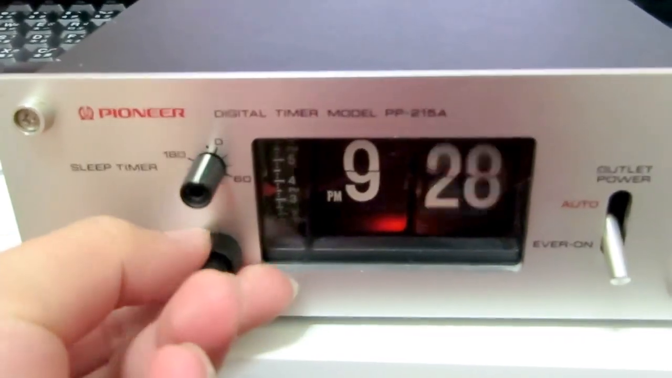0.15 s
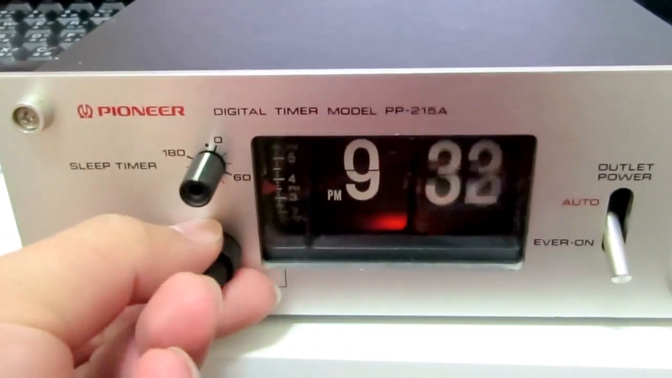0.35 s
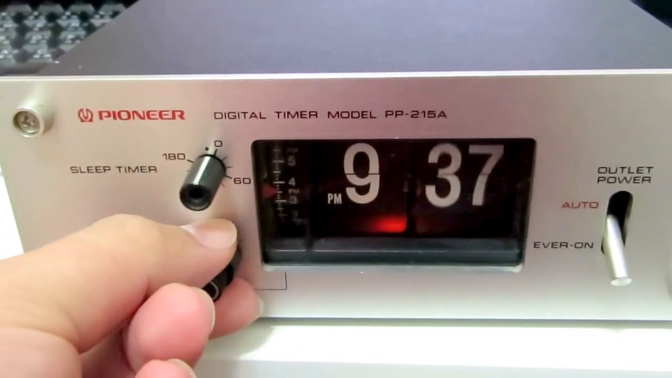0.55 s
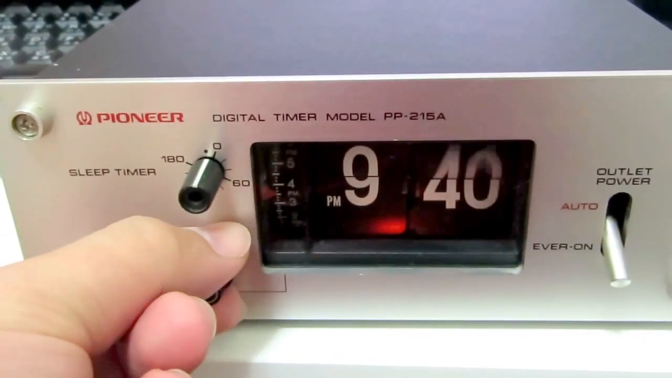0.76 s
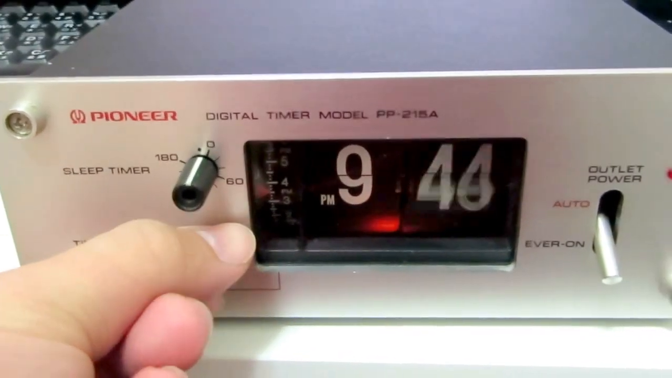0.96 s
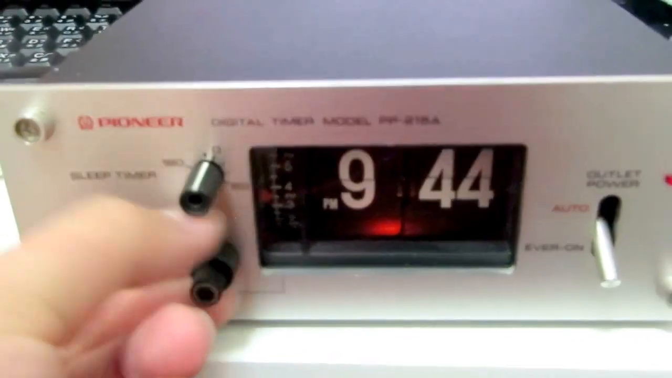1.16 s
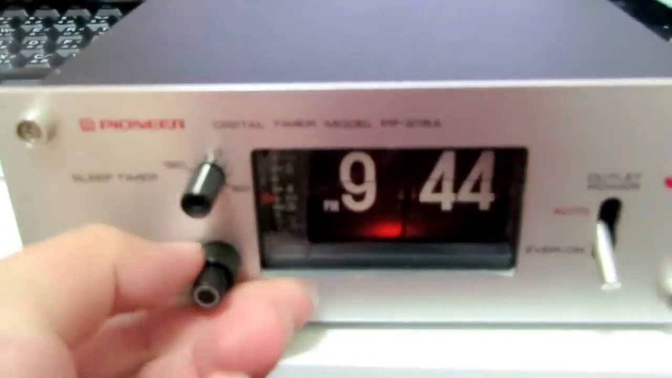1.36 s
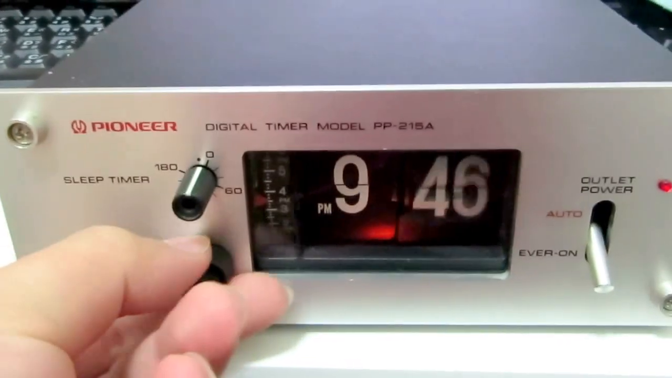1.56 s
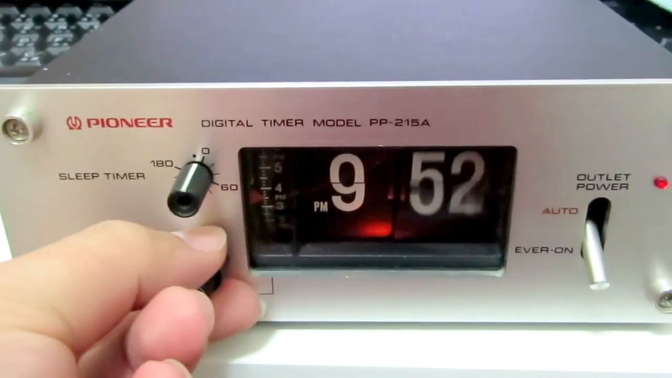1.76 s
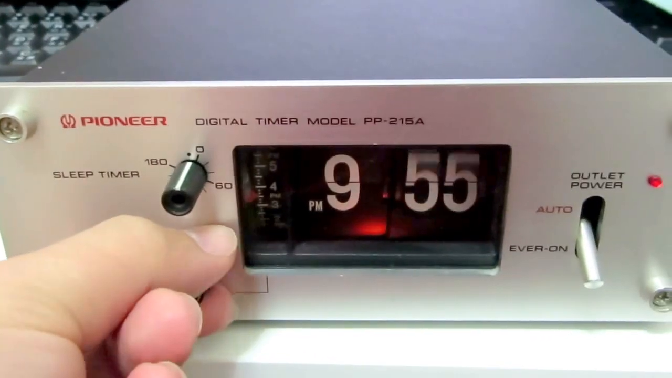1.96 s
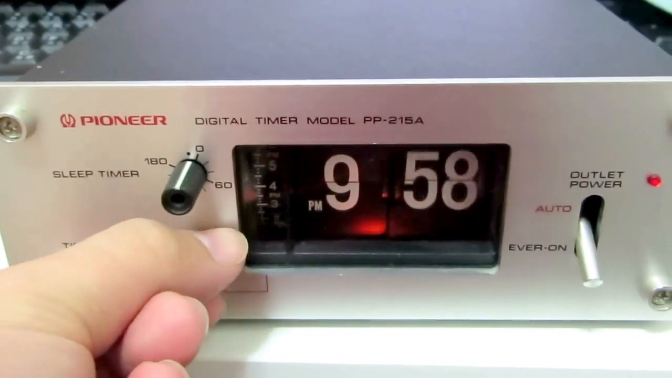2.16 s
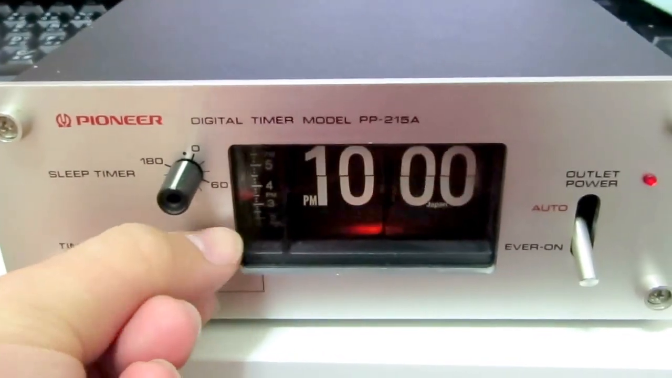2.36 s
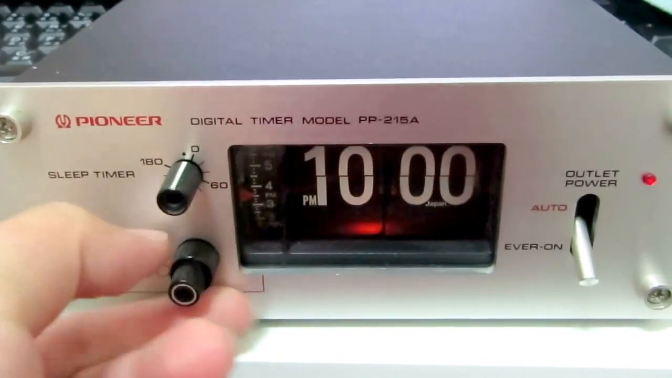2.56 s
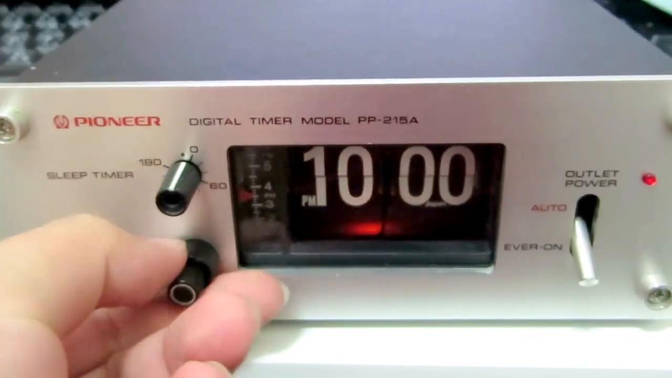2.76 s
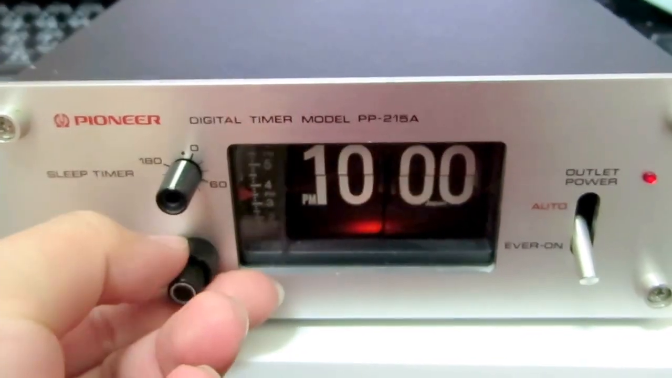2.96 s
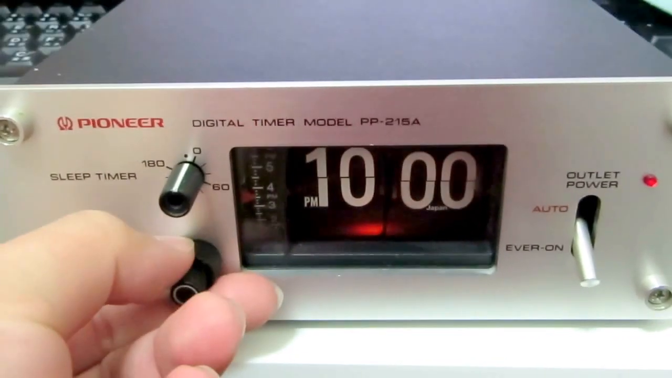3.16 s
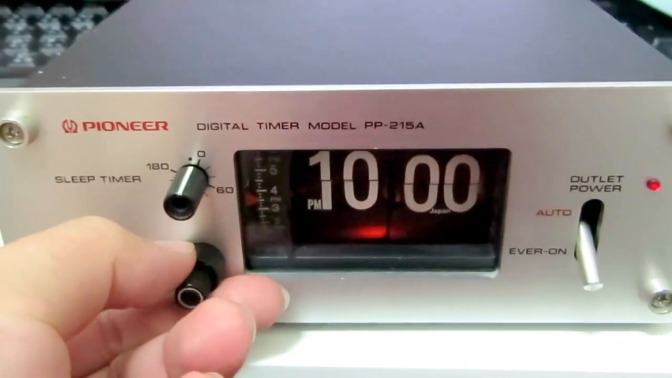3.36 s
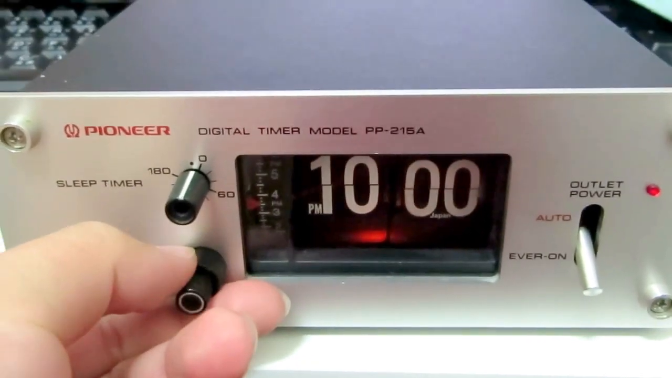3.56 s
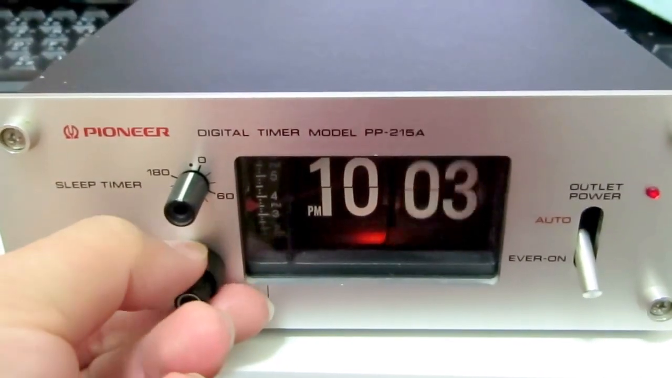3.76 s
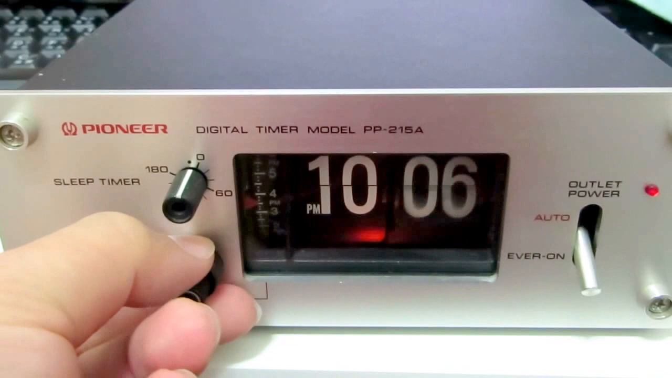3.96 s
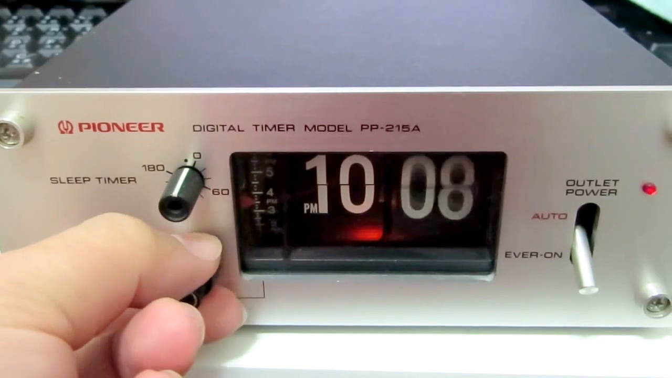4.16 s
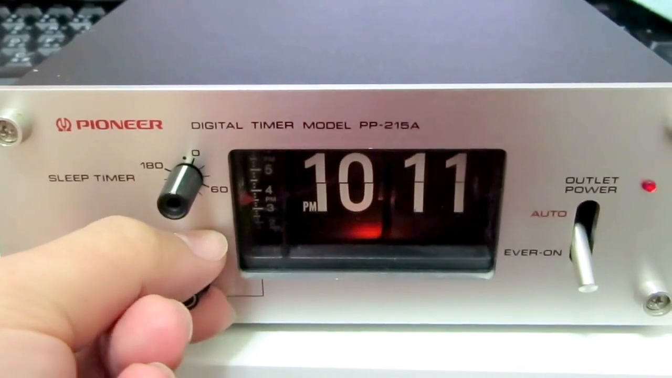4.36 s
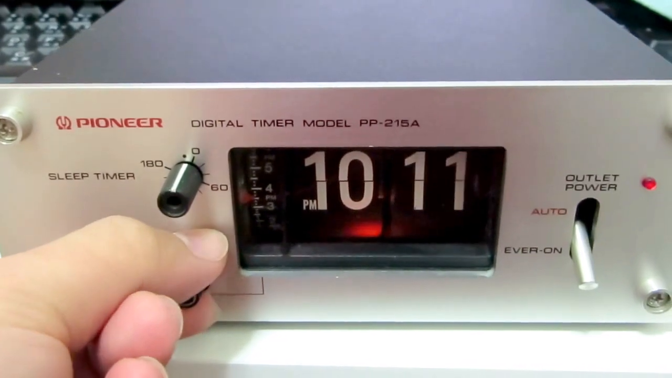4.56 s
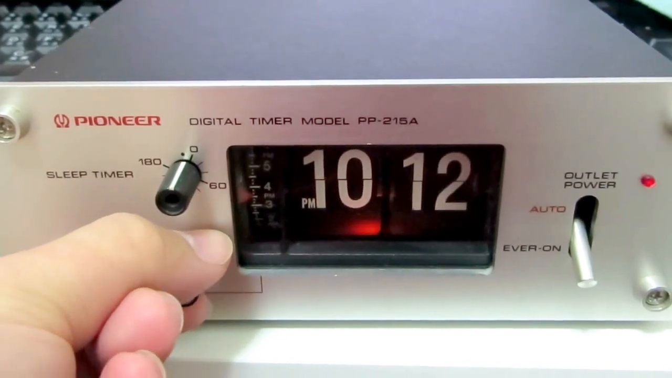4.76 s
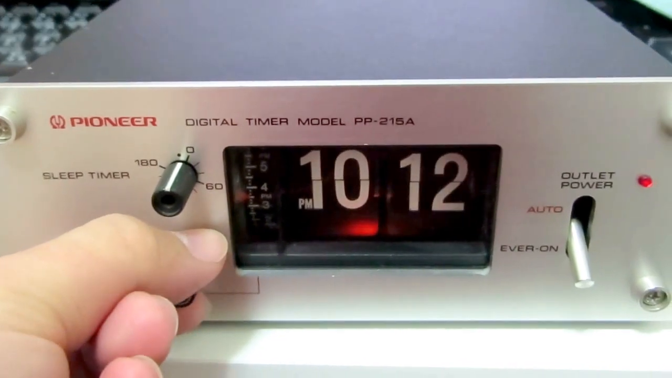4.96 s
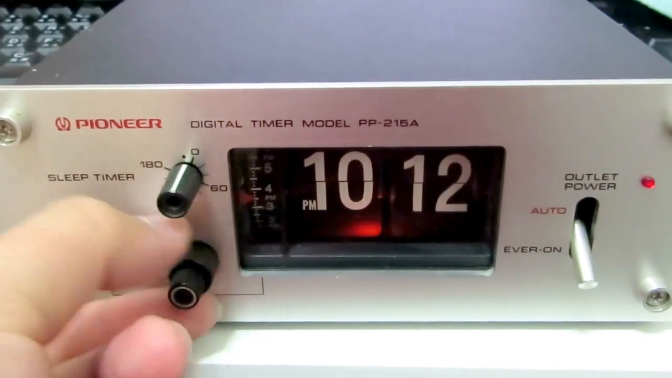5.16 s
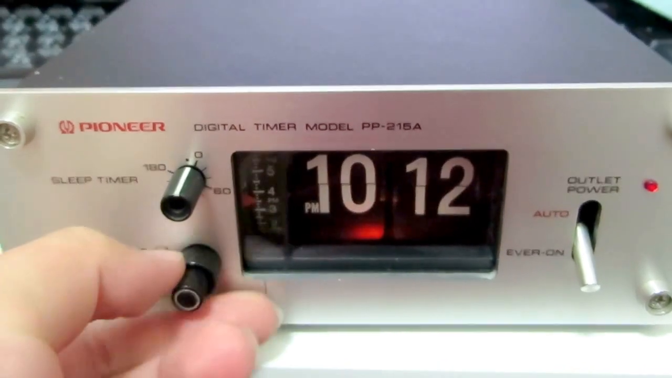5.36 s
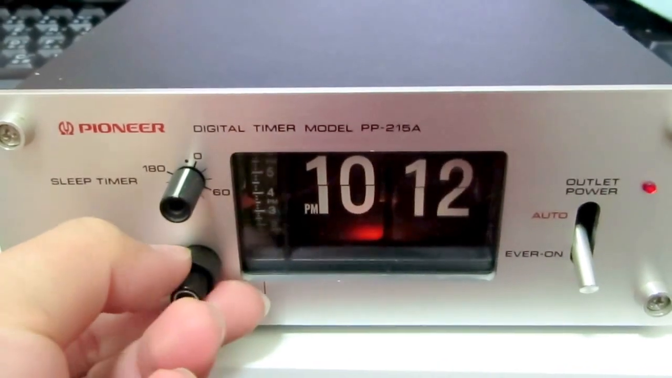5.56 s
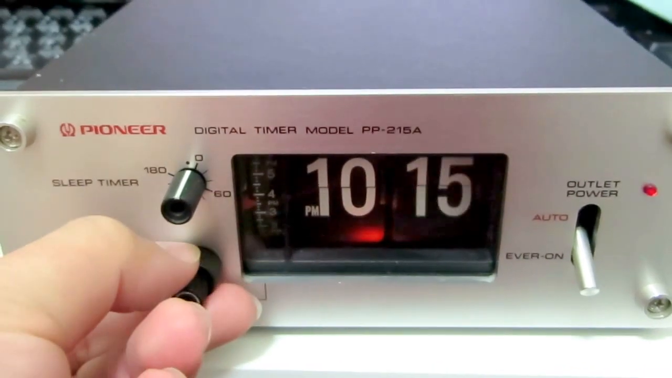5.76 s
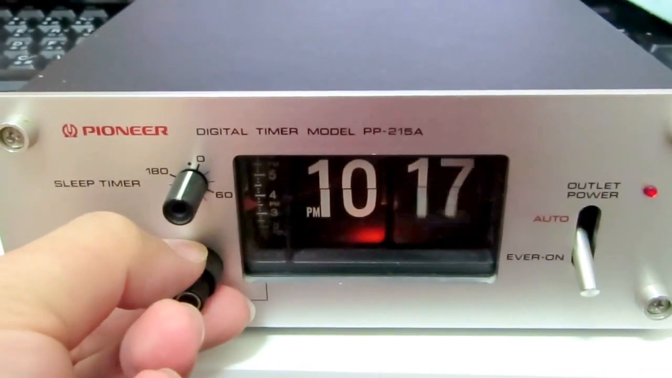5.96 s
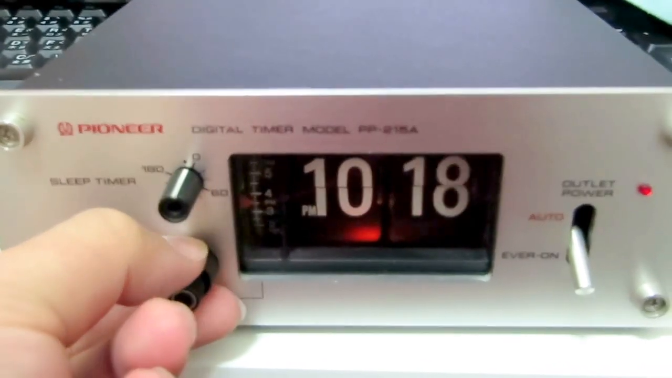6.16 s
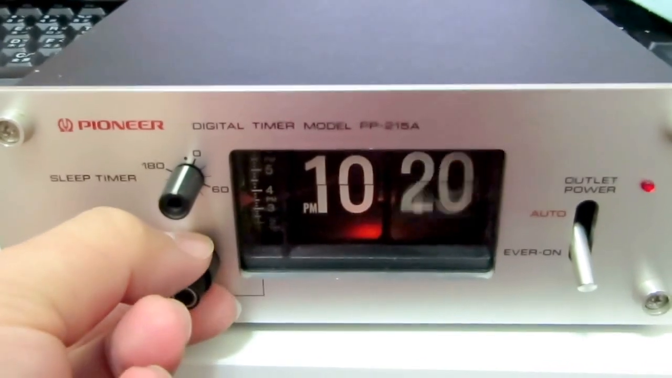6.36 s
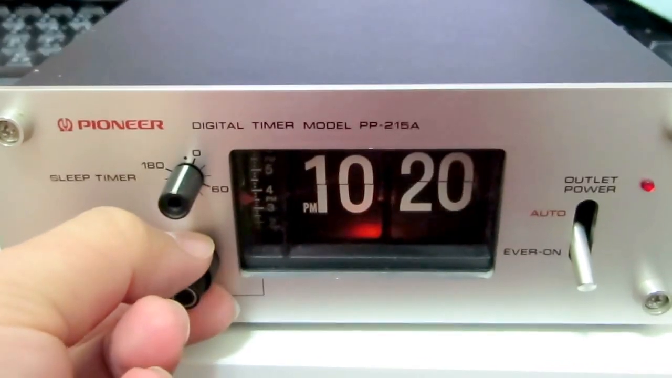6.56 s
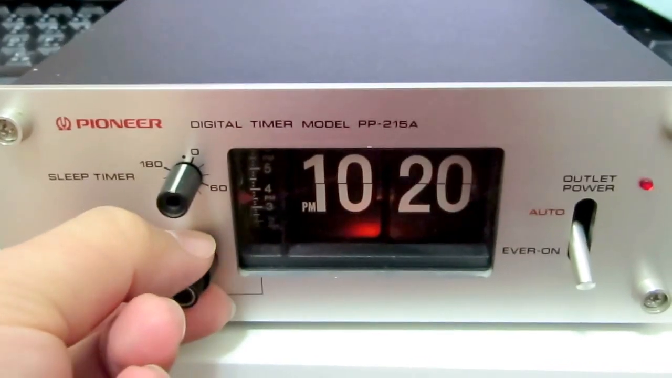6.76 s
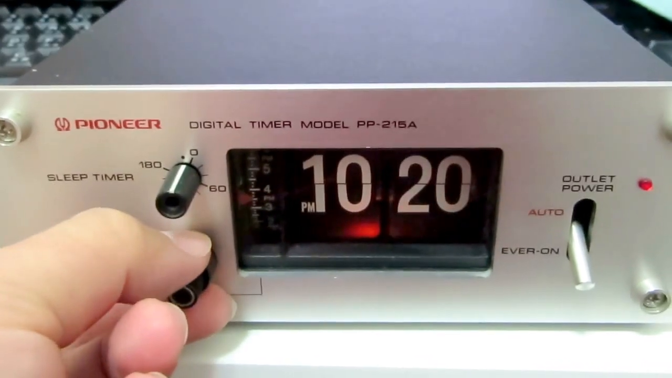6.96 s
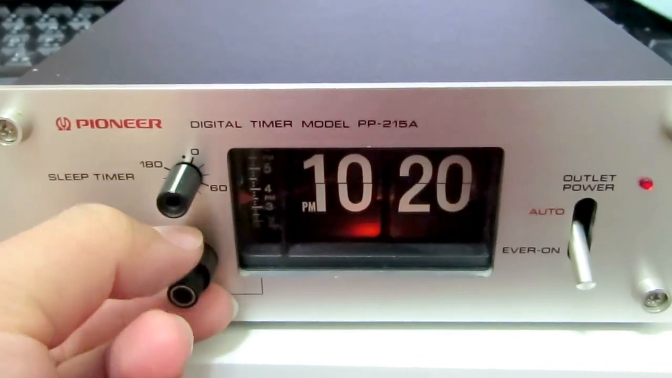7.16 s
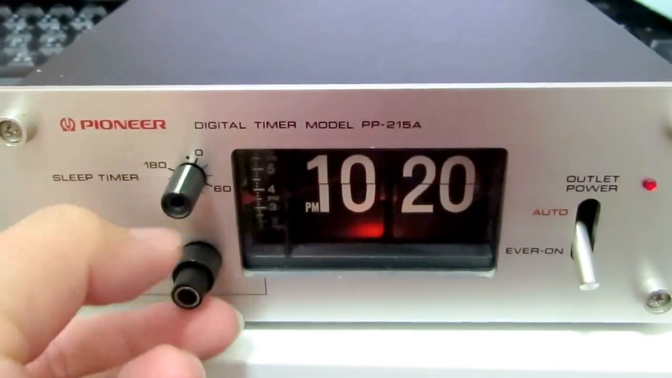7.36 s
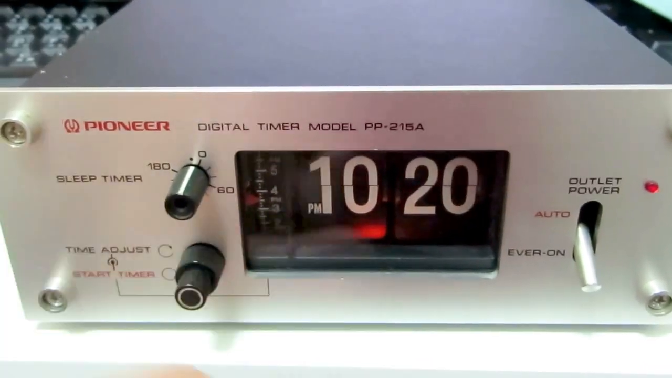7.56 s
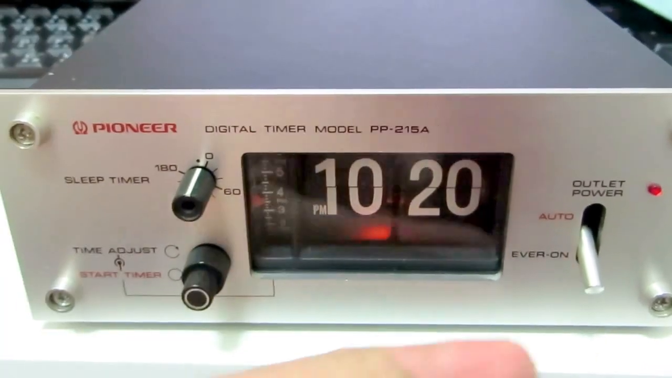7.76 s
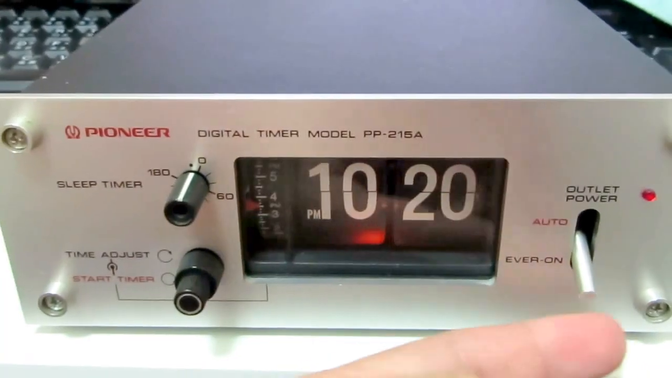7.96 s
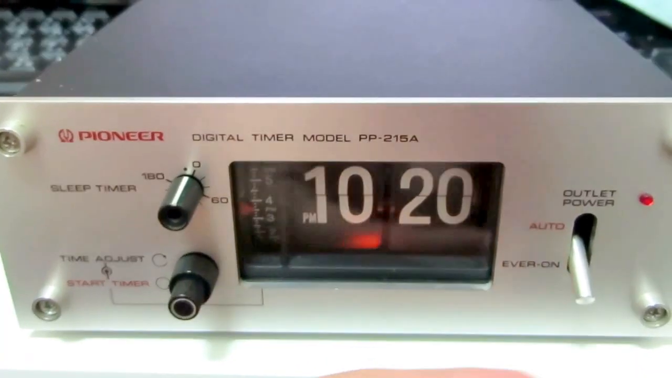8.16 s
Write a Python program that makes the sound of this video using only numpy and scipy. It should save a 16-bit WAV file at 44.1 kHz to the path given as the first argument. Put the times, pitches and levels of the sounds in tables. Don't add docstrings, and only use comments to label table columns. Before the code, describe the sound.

A knob is twisted in four turns, flip clock flaps snapping down in crisp irregular clicks, with small finger taps between over quiet hum.

```python
import sys
import numpy as np
from scipy import signal
from scipy.fft import rfft, irfft, next_fast_len
from scipy.io import wavfile
from scipy.ndimage import uniform_filter1d

SR = 44100
rng = np.random.default_rng(int(sys.argv[2]) if len(sys.argv) > 2 else 0)


def put_to_file(sound):
    columns = np.atleast_2d(sound).T
    safe = np.clip(columns, -1, 1)
    whole_steps = np.round(safe * 32767)
    wavfile.write(sys.argv[1], SR, whole_steps.astype(np.int16))


def boost(x):
    u = np.asarray(x, float) / 20
    return 10 ** u


N = 362061

# frequency in Hz, density in dB per Hz.
AIR_SPECTRUM = [(12, -40), (20, 1), (90, -19.5), (114, -2.5), (226, -9.5), (305, -3), (424, -11),
                (541, -6.5), (793, -12.5), (909, -13), (1530, -15), (1750, -17), (2930, -20), (5500, -24),
                (10000, -33), (13500, -43.5)]
# frequency in Hz, likeness from 0 to 1.
AIR_LIKENESS = [(25, 0.84), (60, 0.81), (85, 1), (140, 0.13), (290, 0.58), (500, 0.039), (850, 0.021),
                (1200, 0.48), (1800, 0.7), (3000, 0.82), (4500, 0.69), (8000, 0.41), (11500, 0.038)]
# frequency in Hz, lead in rad.
AIR_LEAD = [(100, 0), (8000, 0)]
# frequency in Hz, left over right in dB.
AIR_PAN = [(60, -0.5), (150, 0.1), (380, 1), (1300, 0)]
# frequency in Hz, level in dB, width in Hz.
FAN_TONES = [(59.5, -60.5, 3.4), (100, -58, 4.3), (260.8, -50.5, 11), (306.3, -51.5, 6), (358, -53.5, 37),
             (389.4, -56.5, 12), (557, -64, 15), (1565, -61, 16), (2046, -61, 28), (3012, -62.5, 26)]
# time in seconds, level in dB.
MOTOR_LEVEL = [
    (0.0, -57),
    (0.07, -59),
    (0.23, -72),
    (0.5, -59.5),
    (2.7, -56.5),
    (3.88, -62.5),
    (5.88, -54),
    (7.55, -68),
    (7.61, -62),
    (8.21, -58),
]

# frequency in Hz, t60 in seconds.
ROOM_T60 = [(300, 0.46), (1000, 0.29), (3000, 0.24), (8000, 0.27), (13000, 0.21)]
# frequency in Hz, density in dB per Hz.
TAIL_SPECTRUM = [(300, -7), (600, 6.5), (900, -21.5), (1300, 3.5), (1700, -0.5), (2400, 3.5), (2800, 1),
                 (3300, -1), (4500, -6), (6500, -1), (8500, -5), (10500, -5), (12200, -10.5), (12700, -32),
                 (13400, -70)]

# frequency in Hz, level in dB, t60 in seconds.
PANEL_MODES = [(255, -2, .04), (290, 0, .04), (325, 0, .04), (365, -1, .04), (420, -3, .03), (500, -6, .03)]
# time in seconds, peak in dB.
THUDS = [
    (0.357, -26),
    (0.83, -21),
    (1.333, -20.5),
    (1.765, -69),
    (2.434, -27),
    (3.9, -33),
    (4.372, -25),
    (5.78, -52),
    (6.386, -21),
]

# start in seconds, length in seconds, level in dB.
RUBS = [
    (1.284, 0.12, -42.5),
    (3.233, 0.13, -35),
    (3.824, 0.1, -34),
]
# frequency in Hz, density in dB per Hz.
RUB_SPECTRUM = [(150, -42), (250, -9), (415, -2), (896, -1), (1070, -7.5), (1420, -3.5), (1620, -12),
                (3660, -14), (4840, -20), (8440, -23.5), (12500, -39), (16200, -65), (22000, -120)]

# frequency in Hz, level in dB, t60 in seconds.
CASE_MODES = [(554, 4.5, 0.05), (595.3, 7, 0.055), (906, -9, 0.2), (1261.3, 10, 0.086), (1285, 15, 0.073),
              (1382, 6.5, 0.066), (1450, -7, 0.047), (1561, 6, 0.083)]
CASE_FACING = [1, 1, 1, 1, 1, -1, 1, 1]
# frequency in Hz, level in dB, t60 in seconds.
LOW_MODES = [(1912, -39, 0.083), (1949, -26, 0.12), (2163, -17.5, 0.09), (2202, -3.5, 0.031),
             (2316, 7, 0.015), (2375, -5, 0.022), (2590, -18.5, 0.052), (2930, -23, 0.075)]
# frequency in Hz, level in dB, t60 in seconds.
CRACK_MODES = [(3100, -10, .003), (4700, -4, .002), (6900, 0, .002), (9200, 0, .002), (11300, -5, .002)]
# frequency in Hz, level in dB, t60 in seconds.
MIDDLE_MODES = [(3200, -5, .009), (3500, -7, .009), (3720, -5, .010), (4000, -3, .016), (4300, -8, .008),
                (4700, -7, .007), (5100, -7, .009)]
# frequency in Hz, level in dB, t60 in seconds.
BENDING_MODES = [(5420, -3, .012), (5850, -2, .013), (6300, -7, .010), (6500, -3, .014), (6950, -6, .010),
                 (7350, -4, .011)]
# frequency in Hz, level in dB, t60 in seconds.
EDGE_MODES = [(7800, -5, .010), (7960, 0, .013), (8300, -8, .008), (8560, -1, .014), (9050, -10, .008)]
# frequency in Hz, level in dB, t60 in seconds.
HIGH_MODES = [(9300, -7, .009), (9850, 0, .012), (10250, -1, .013), (10700, -5, .008), (11200, -9, .007),
              (11750, -8, .011), (12300, -12, .011), (13600, -26, .009)]

# time in seconds, peak in dB, case in dB, low knock in dB, both re the peak.
TAPS = [(0.077, -33, -0.5, 4), (0.2249, -36, -1, 1), (0.2384, -25.5, -10.5, -7), (1.296, -23, -6.5, -4),
        (1.3028, -24, -28, 0), (1.3324, -33, 1, 7), (1.5299, -33.5, 0, 0), (1.5891, -24.5, -30, 10.5),
        (1.604, -37, -20, 11), (1.6174, -39, -13, 3), (1.6302, -27, -6, 0), (2.6495, -30.5, -24, -5),
        (2.813, -26.5, -9, 1.5), (2.9138, -39, -2, 7), (2.9309, -24.5, -15, -9), (5.3564, -32, -7, -1),
        (5.3675, -24, -7, -12), (5.5222, -23, -11, -2), (5.535, -38, -12, 7), (5.6336, -26, -11, -7),
        (7.431, -39, 2, 7)]
# middle, bending, edge and high, all in dB re the peak.
TAP_COLOUR = (-13.5, -13, -14, -37)
# time in seconds, peak in dB.
REBOUNDS = [(.390, -26), (.794, -27), (.831, -12), (1.152, -19.5), (1.360, -33), (1.802, -14), (2.202, -33),
            (2.231, -42), (2.297, -29), (2.435, -33), (2.629, -34), (4.048, -27.5), (4.275, -35),
            (4.413, -46), (4.533, -27.5), (4.813, -41), (5.814, -36), (5.834, -32), (6.101, -41),
            (6.150, -27), (6.386, -14.5), (6.557, -26.5)]
# time in seconds, peak in dB.
RELEASES = [(0.31, -27.5), (0.599, -14), (1.042, -32), (1.1, -19), (2.175, -40), (2.397, -18), (3.86, -22),
            (4.351, -12.5), (4.877, -30), (5.750, -27), (5.759, -31), (6.048, -42), (6.301, -31)]
# (middle, bending, edge, high in dB).
CLICK_COLOUR = (-7.5, -19.5, (-13.5, -21, -20, -36))

# time in seconds, peak in dB, weight on the case in dB,
# low knock in dB, loudest high mode in Hz.
FIRST_TURN = [(0.3224, -4.5, -17, -44, 7950), (0.344, -1.5, -21, -35, 7800), (0.374, -1, -21.5, -43, 10100),
              (0.4506, 1, -27, -34, 8350), (0.5124, -0.5, -20, -19.5, 10000), (0.545, 1.5, -31, -24, 8500),
              (0.604, -1.5, -18, -14, 8130), (0.6507, 1, -31, -20, 8300), (0.7001, -2, -18, -11, 8600),
              (0.7575, 0.5, -26.5, -23, 8700), (0.82, -5.5, -14, -12, 9300), (0.8643, -2.5, -29, -14, 8140),
              (0.927, 1.5, -33, -45, 8130), (1.0174, -5, -20.5, -18, 7650), (1.063, 1, -25, -13, 6800),
              (1.1177, -8, -23.5, -8.5, 8760)]
SECOND_TURN = [(1.6929, -2, -23, -16, 6700), (1.725, -2, -18, -21, 8400), (1.7454, -2, -26, -14, 7800),
               (1.768, -2, -20, -39, 8260), (1.792, -8, -18, -11.5, 6700), (1.8265, -4, -21, -29, 6700),
               (1.85, -4, -28, -14.5, 9600), (1.916, -3, -16, -20, 8260), (1.947, -3, -22.5, -12, 8700),
               (1.9878, -5, -17.5, -39, 8000), (2.0245, -9.5, -24, -9, 7400),
               (2.1317, -4, -22.5, -17, 8460), (2.191, 0, -30, -15.5, 8030), (2.2744, -4, -22, -18.5, 8100),
               (2.333, -2.5, -23, -18.5, 6440), (2.4253, -5, -22, -21.5, 7800),
               (2.4672, -5, -29, -44, 7460)]
THIRD_TURN = [(3.296, -3, -25.5, -24, 8080), (3.873, -2, -26, -26, 7270),
              (3.9009, -3.5, -19.5, -17.5, 7570), (3.9436, -1, -26, -21, 7950), (3.983, -2, -25, -19, 7510),
              (4.1109, -6.5, -20.5, -31, 7750), (4.152, -2.5, -22.5, -22, 8100),
              (4.2384, -6, -20.5, -30, 8170), (4.3049, 1, -23, -41, 10000), (4.37, -3, -22.5, -33, 8200),
              (4.45, 0, -21.5, -34, 9700), (4.791, -1.5, -26.5, -21, 8260), (4.903, 1.5, -21.5, -20, 8940)]
FOURTH_TURN = [(5.7739, 1.5, -30.5, -34, 8360), (5.8884, 0.5, -22, -26, 10000),
               (5.9853, -0.5, -33, -48, 8230), (6.0619, -1.5, -19, -13.5, 8100), (6.212, 0, -30, -19, 8200),
               (6.3638, -1.5, -18.5, -12, 8500), (6.488, -2, -32, -16.5, 8100),
               (6.826, 3.5, -29.5, -24, 6600)]
# middle modes in dB, bending modes in dB, high modes in dB.
SPOTS = [(-20.5, -14.5, -10.5), (-23, -17, -27), (-31, -17.5, -18), (-29, -24, -27), (-16, -13.5, -12),
         (-24, -22, -25), (-21, -16.5, -23), (-28, -24, -27), (-18, -18.5, -25), (-30, -24, -36),
         (-19, -19.5, -20), (-23, -24, -20), (-29, -27, -29), (-18, -20.5, -23), (-41, -14, -38),
         (-20, -18.5, -20), (-24, -15, -31), (-15, -17, -32), (-48, -14.5, -16), (-15, -21, -31),
         (-28, -17, -19), (-19, -16.5, -19), (-34, -21, -20), (-15.5, -17, -15), (-21, -13.5, -12.5),
         (-16, -19.5, -16), (-21, -11.5, -16.5), (-20, -21.5, -20), (-27, -20, -22), (-27, -21.5, -26),
         (-25, -19, -19), (-24, -19.5, -20), (-17.5, -18, -13.5), (-28, -23, -20.5), (-25, -23, -26),
         (-21.5, -17, -18.5), (-26, -27, -19), (-26, -17, -19), (-20.5, -18, -18), (-28, -17, -15),
         (-27, -18.5, -21), (-33, -18, -14), (-29, -25, -20), (-22, -12.5, -12.5), (-23, -20, -16),
         (-20, -15.5, -20), (-24, -20.5, -36), (-21, -18, -16), (-21, -20.5, -21), (-16.5, -17.5, -32),
         (-22, -27, -24), (-14, -17, -16), (-27, -22.5, -24), (-32, -23, -33)]
EDGE_LEVELS = [(-11), (-16), (-19.5), (-13.5), (-17), (-14), (-14), (-13), (-16), (-21), (-23), (-19),
               (-22), (-20), (-12.5), (-17.5), (-16), (-15.5), (-16), (-10), (-16), (-20), (-19.5), (-8.5),
               (-13.5), (-11), (-13), (-18.5), (-12), (-20), (-15), (-16), (-15.5), (-14.5), (-25), (-16.5),
               (-15), (-17.5), (-15), (-15), (-10.5), (-17), (-8.5), (-13), (-11.5), (-12.5), (-12), (-17),
               (-12.5), (-15.5), (-15), (-13.5), (-17.5), (-25)]
# low in Hz, middle in Hz, bending in Hz.
FLAP_TONES = [(2870, 3140, 5710), (2210, 3370, 6470), (2430, 5110, 5700), (2190, 3370, 6510),
              (2280, 3010, 5860), (2400, 4070, 6500), (2140, 3340, 7400), (2360, 3560, 6510),
              (2150, 5120, 5700), (2350, 3330, 6490), (2140, 4330, 5710), (2340, 3350, 6470),
              (2140, 4310, 6480), (2100, 3970, 7400), (2140, 4340, 6470), (2080, 3180, 5860),
              (2170, 4080, 6640), (2360, 3980, 6270), (2160, 3180, 6030), (2360, 3960, 5870),
              (2170, 3730, 6470), (2120, 3940, 6460), (2350, 3140, 6660), (2080, 3950, 6480),
              (2360, 3010, 6700), (1850, 3970, 7400), (2330, 2980, 6680), (2090, 3890, 5880),
              (2360, 4070, 6510), (2280, 3220, 5380), (2380, 4080, 6480), (1870, 3900, 6430),
              (2940, 3950, 6680), (2060, 4940, 6700), (2350, 3060, 7380), (2860, 4090, 6010),
              (2190, 4110, 7210), (2100, 4060, 7160), (2910, 4110, 5440), (1880, 5140, 7000),
              (2280, 4070, 6040), (1860, 5120, 5990), (2910, 3010, 6970), (2890, 5150, 5390),
              (1960, 3930, 6700), (2170, 5110, 5680), (2310, 4160, 6490), (2150, 3330, 5680),
              (2300, 4150, 5760), (2140, 5140, 6020), (2190, 3520, 7300), (2160, 5150, 5890),
              (2310, 3330, 6480), (2130, 4820, 6480)]
CHATTERS = [0.011, 0.014, 0.027, 0.013, 0.013, 0.013, 0.018, 0.015, 0.015, 0.02, 0.0206, 0.018, 0.022,
            0.027, 0.012, 0.02, 0.019, 0.02, 0.02, 0.015, 0.025, 0.019, 0.025, 0.013, 0.015, 0.018, 0.015,
            0.022, 0.012, 0.019, 0.018, 0.015, 0.02, 0.019, 0.0165, 0.02, 0.013, 0.021, 0.015, 0.016, 0.013,
            0.017, 0.0087, 0.013, 0.016, 0.0146, 0.012, 0.0181, 0.013, 0.018, 0.013, 0.011, 0.016, 0.0151]
# middle, bending, edge and high in dB.
SPOT_TRIM_DB = (0.23, 2.4, 3.85, 0.76)

# frequency in Hz, likeness from 0 to 1.
NEAR_LIKENESS = [(250, .7), (600, .92), (1300, .99), (2400, .9995), (3600, .995), (5500, .97), (8000, .91),
                 (11000, .74), (13000, .58)]
# frequency in Hz, lead in rad.
NEAR_LEAD = [(1000, -.04), (7000, -.08), (9000, .2), (13000, .85)]
# frequency in Hz, left over right in dB.
NEAR_PAN = [(300, 1.5), (600, 1.5), (2000, .4), (8000, -.9), (13000, -1.5)]
# frequency in Hz, gain in dB.
MIC_RESPONSE = [(11500, 0), (12400, -7), (12900, -9.5), (13800, -12), (14300, -26), (15800, -21),
                (16600, -26), (16850, -76)]


def evened(x):
    return x / np.sqrt(np.mean(x ** 2) + 1e-20)


def smooth_twice(x, first, second, first_axis=-1, second_axis=-1):
    once = uniform_filter1d(x, first, axis=first_axis)
    return evened(uniform_filter1d(once, second, axis=second_axis))


def read(points, hz):
    f, value = np.transpose(points)
    return np.interp(np.log(hz + 1), np.log(f + 1), value)


def add(mix, s, sound):
    part = mix[:, round(s * SR):][:, :sound.shape[1]]
    part += sound[:, :part.shape[1]]


def ports(pair, likeness, lead, pan=((1, 0), (2, 0))):
    size = next_fast_len(N)
    hz = np.fft.rfftfreq(size, 1 / SR)
    a, b = rfft(pair, size)
    c = np.clip(read(likeness, hz), -1, 1)
    half_pan = boost(read(pan, hz) / 2)
    shared = c * a * np.exp(-1j * read(lead, hz))
    right = (shared + np.sqrt(1 - c ** 2) * b) / half_pan
    return irfft([a * half_pan, right], size)[:, :N]


def noise(spectrum, patchy_db):
    frames, hz = N // 256 + 5, np.fft.rfftfreq(1024, 1 / SR)
    a, b, c, d, patches = rng.standard_normal((frames, 513, 5)).T
    patches = smooth_twice(patches, 12, 14, first_axis=0, second_axis=1)
    z = np.array([a + 1j * b, c + 1j * d])
    z = z * boost(read(spectrum, hz)[:, None] + patchy_db * patches)
    return evened(signal.istft(z, nperseg=1024, noverlap=768)[1][:, :N])


def fans():
    size = next_fast_len(N)
    hz, resonance = np.fft.rfftfreq(size, 1 / SR), 0
    for tone_hz, db, width in FAN_TONES:
        height = boost(db) / np.sqrt(np.pi * width / SR)
        resonance = resonance + height / (1 + ((hz - tone_hz) / width) ** 2)
    return irfft(rfft(rng.standard_normal((2, size))) * resonance, size)[:, :N]


def motor():
    t = np.arange(N) / SR
    drift = smooth_twice(rng.standard_normal((4, N // 100 + 1)), 40, 40)
    waver = uniform_filter1d(np.repeat(drift, 100, axis=1), size=100)[:, :N]
    level_db = np.interp(t, *np.transpose(MOTOR_LEVEL)) + 11.5 + 1.4 * waver[:2]
    phase = 0.5 * waver[2:] + np.array([[0], [1.5]])
    return boost(level_db) * np.sin(2 * np.pi * 119.8 * t + phase)


def background():
    air = boost(-40) * noise(AIR_SPECTRUM, 0.17)
    return ports(air + fans() + motor(), AIR_LIKENESS, AIR_LEAD, AIR_PAN)


def room(x):
    hop = 64
    how = {"nperseg": 4 * hop, "noverlap": 3 * hop}
    feed = uniform_filter1d((x ** 2).mean(0), hop)[::hop]
    frame = np.arange(len(feed))
    far_wall = np.interp(frame - 0.021 * SR / hop, frame, feed, left=0)
    hz = np.fft.rfftfreq(4 * hop, 1 / SR)
    keep = boost(-120 * hop / SR / read(ROOM_T60, hz))
    own = abs(signal.stft(x[0], **how)[2][:, :len(feed)]) ** 2
    own = uniform_filter1d(own, size=3, axis=0) + 1e-14
    colour = (own / own.mean(0) * own.mean() / own.mean(1)[:, None]) ** 0.33
    power = []
    for k, tint in zip(keep, colour):
        source = np.append(feed * tint + boost(-20) * far_wall, [0, 0, 0])
        power.append(signal.lfilter([0, 0, 1 - k], [1, -k], source))
    power = np.array(power)
    a, b, c, d = rng.standard_normal(power.T.shape + (4,)).T
    flutter = boost(-1.5 + 1.4 * evened(uniform_filter1d(rng.standard_normal(power.shape[1]), 4)))
    bands = smooth_twice(rng.standard_normal(power.T.shape).T, 70, 2, first_axis=1, second_axis=0)
    level = boost(read(TAIL_SPECTRUM, hz)[:, None] + 2.6 * bands) * flutter
    z = np.array([a + 1j * b, c + 1j * d]) * np.sqrt(np.abs(power)) * level
    return signal.istft(z, **how)[1][:, :N]


def ring(drive, modes, scatter_db, detune, swell, share=1, facing=1):
    hz, db, t60 = np.transpose(modes)[..., None]
    luck = rng.standard_normal((len(modes), 2))
    length = drive.shape[1]
    t = np.arange(min(length, round(SR * share * t60.max()))) / SR
    decay = boost(db + scatter_db * luck[:, :1] - 60 * t / (share * t60))
    body = decay * np.sin(2 * np.pi * hz * (1 + detune * luck[:, 1:]) * t)
    response = (np.reshape(facing, (-1, 1)) * body).sum(0) * (1 - np.exp(-t / swell))
    out = signal.fftconvolve(drive, response[None], axes=1)[:, :length]
    return out / np.sqrt(uniform_filter1d(out[0] ** 2, size=130).max())


def brief(drive, *how):
    return np.pad(ring(drive[:, :1300], *how), ((0, 0), (0, drive.shape[1] - 1300)))


def thud(s, peak_db):
    push = rng.standard_normal((2, 6000)) * boost(-60 * np.arange(6000) / SR / 0.022)
    return s, boost(peak_db - 6.5) * ring(push, PANEL_MODES, 1.7, 0.03, 0.006, 0.75)


def rubbing():
    t, level = np.arange(N) / SR, np.zeros(N)
    for s, length, db in RUBS:
        rise, fall = (t - s) / 0.011, (s + length - t) / 0.038
        level += boost(db) * np.clip(np.minimum(rise, fall), 0, 1)
    grain = boost(1.8 * evened(uniform_filter1d(rng.standard_normal(N), 150)))
    return uniform_filter1d(level, 300) * grain * noise(RUB_SPECTRUM, 0.33)


def slap(s, case_db, low_db, crack_db, modes_db, rise, chatter, grip=1, top_hz=8207,
         tones=(2250, 4000, 6500)):
    t = np.arange(3000) / SR
    force = (1 - np.exp(-(t / rise) ** 2)) * boost(-60 * (t / chatter) ** 1.05)
    uneven = boost(3.6 * np.minimum(rng.exponential(1, len(t)), 3))
    drive = force * rng.standard_normal((2, len(t))) * uneven
    first_contact = np.arange(len(t)) == round(1.5 * rise * SR)
    drive = drive + boost(16.0) * first_contact
    push = np.diff(np.sqrt(force), prepend=0) + 0.03 * drive
    low_modes = LOW_MODES + [(tones[0], 8 * grip - 8, 0.024)]
    parts = [ring(push, CASE_MODES, 1.2, 0.002, 0.005, grip, CASE_FACING),
             ring(force * drive, low_modes, 2, 0.003, 0.0009, 0.8 * grip),
             brief(drive, CRACK_MODES, 1, 0.05, 0.00005)]
    damping = 0.55 * (1 + grip) / 2
    groups = ((MIDDLE_MODES, 5300), (BENDING_MODES, 7400), (EDGE_MODES, 9100), (HIGH_MODES, 14000))
    for modes, end_hz in groups:
        loudest = []
        for hz in (*tones, top_hz):
            if modes[0][0] - 250 <= hz < end_hz:
                loudest.append((hz, 12 * grip - 11, 70 / hz))
        parts.append(brief(drive, modes + loudest, 1.8, 0.004, 0.0002, damping))
    levels = boost(np.array([case_db, low_db, crack_db, *modes_db]))
    fade = np.minimum(1, (t[-1] - t) / 0.0062)
    return s - 0.0004, np.tensordot(levels, parts, 1) * fade


def tap(s, db, case_db, low_db):
    modes_db = db + np.array(TAP_COLOUR)
    return slap(s, db + case_db - 4.5, db + low_db - 8.5, db - 15.5, modes_db, 0.00064, 0.03, grip=0.45)


def click(s, db):
    case_db, low_db, modes_db = CLICK_COLOUR
    return slap(s, db + case_db - 8.5, db + low_db + 0.5, db - 12, db + np.array(modes_db), 0.00083, 0.023)


def flap(row, spot, edge_db, tones, chatter):
    s, peak_db, weight_db, knock_db, top_hz = row
    middle_db, bending_db, high_db = spot
    modes_db = np.array([middle_db, bending_db, edge_db, high_db]) + SPOT_TRIM_DB
    low_db = peak_db + max(knock_db, -27)
    return slap(s, peak_db + weight_db - 0.5, low_db, peak_db - 11, modes_db, 0.0004, 1.315 * chatter,
                top_hz=top_hz, tones=tones)


def scene():
    clock = rubbing()
    turns = FIRST_TURN + SECOND_TURN + THIRD_TURN + FOURTH_TURN
    for falling in zip(turns, SPOTS, EDGE_LEVELS, FLAP_TONES, CHATTERS):
        add(clock, *flap(*falling))
    for row in TAPS:
        add(clock, *tap(*row))
    for row in REBOUNDS + RELEASES:
        add(clock, *click(*row))
    clock = clock + boost(-25.5) * room(clock)
    for row in THUDS:
        add(clock, *thud(*row))
    no_bass = signal.butter(4, 200, "highpass", fs=SR, output="sos")
    clock = signal.sosfilt(no_bass, clock)
    return ports(clock, NEAR_LIKENESS, NEAR_LEAD, NEAR_PAN) + background()


def roll_off(x):
    return signal.sosfilt(signal.butter(12, 16800, fs=SR, output="sos"), x)


def record(dry):
    size = next_fast_len(N)
    held = 1.152 * np.tanh(dry / 1.593)
    response = boost(read(MIC_RESPONSE, np.fft.rfftfreq(size, 1 / SR)))
    heard = irfft(rfft(held, size) * response, size)[:, :N]
    return roll_off(heard)


dry = scene()
out = record(dry)
put_to_file(out)
```